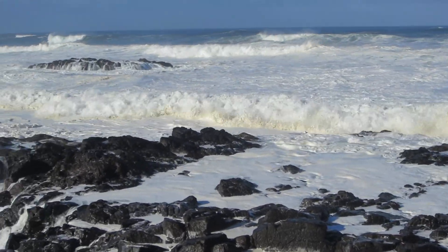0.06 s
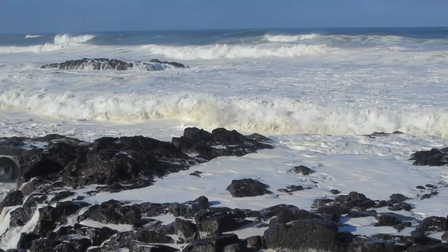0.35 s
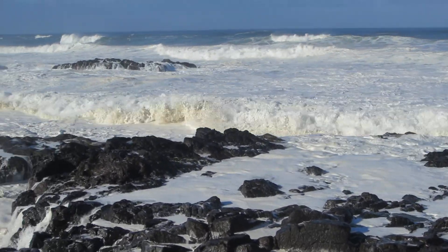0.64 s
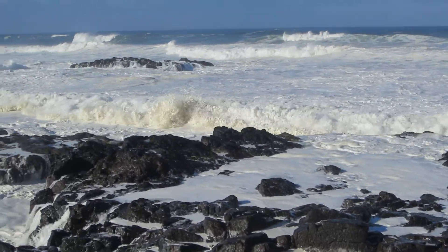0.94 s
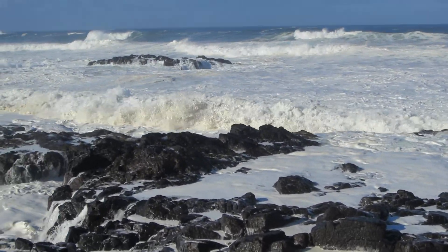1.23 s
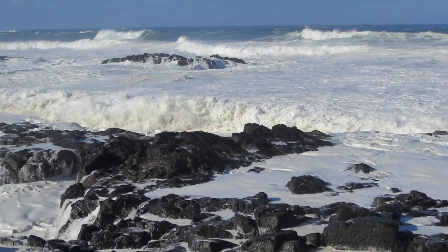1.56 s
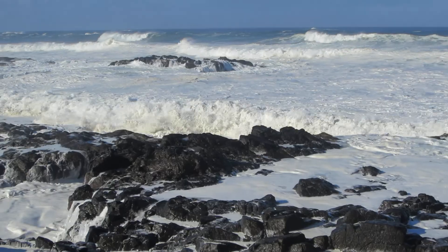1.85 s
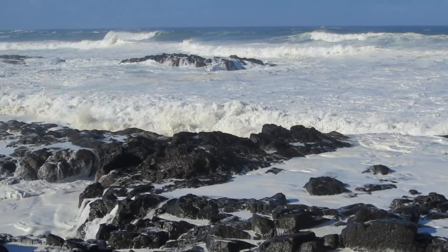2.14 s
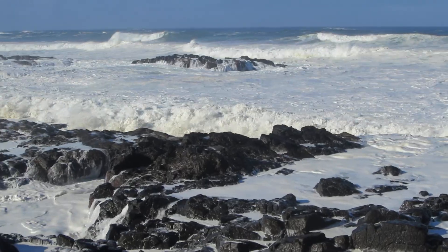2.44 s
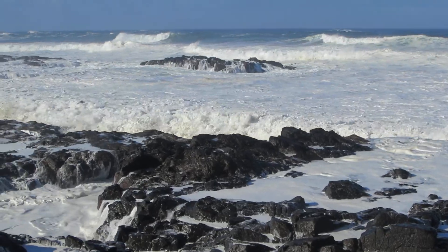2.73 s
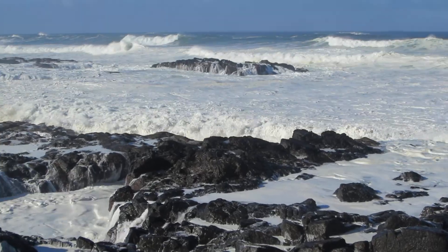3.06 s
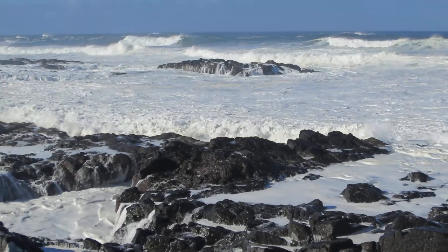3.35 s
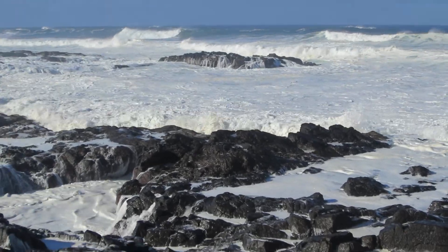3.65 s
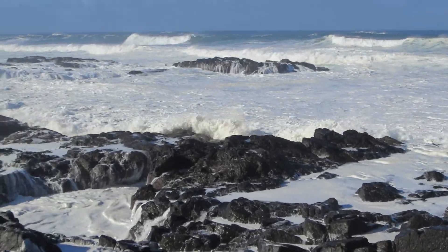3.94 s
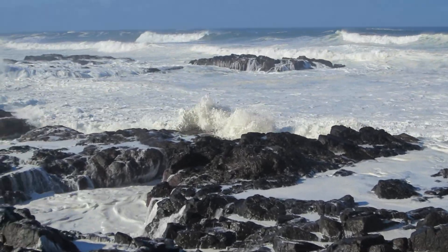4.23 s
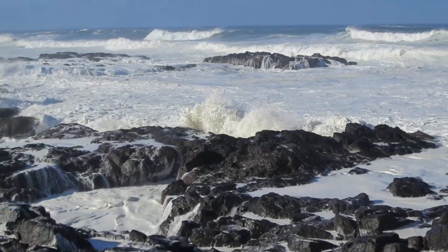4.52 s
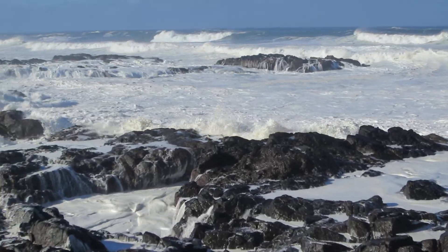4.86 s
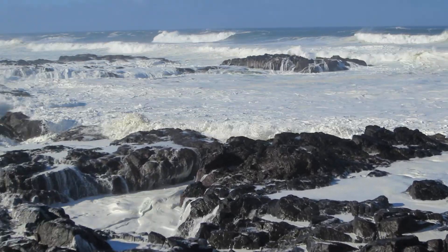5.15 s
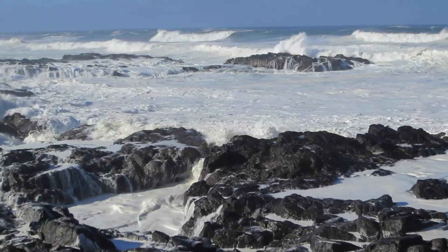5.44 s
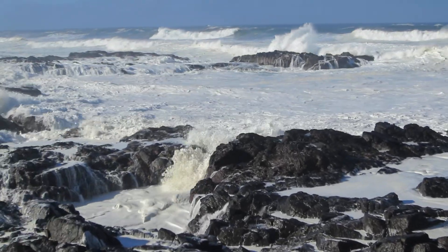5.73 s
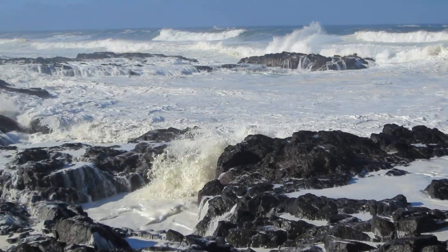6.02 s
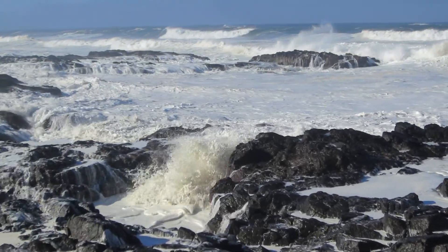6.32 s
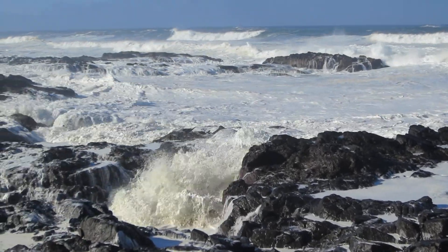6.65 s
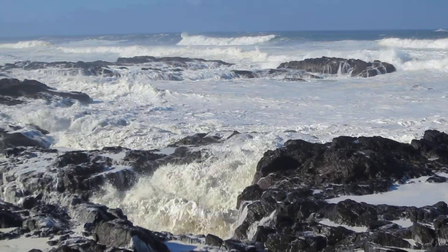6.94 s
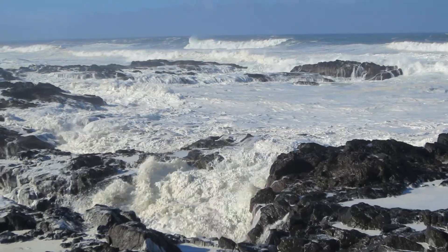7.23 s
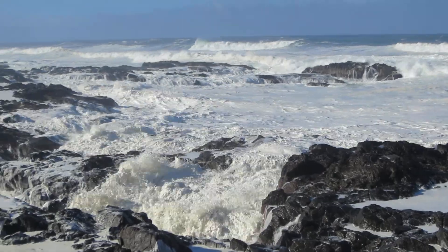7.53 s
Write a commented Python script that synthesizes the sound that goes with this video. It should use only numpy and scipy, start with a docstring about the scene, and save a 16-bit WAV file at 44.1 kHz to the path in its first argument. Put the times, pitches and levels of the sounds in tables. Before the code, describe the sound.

Heard through a small microphone above a rocky shore, large breakers rumble and white water roars without pause, over a wavering low hum. The rumble swells briefly several times while foam fizzes in soft, even pulses. Spray flares briefly on the stone midway. Toward the end, churning water fills a gap in the rocks with a slightly hollow tone, and the fizz grows duller.

```python
"""Heavy surf on rocks

Breakers rumble as clouds of trapped air pulse under them. White water roars in and surges
into a gully, whose hollow rings. Foam bursts in a hiss and spray patters on stone:
the smaller the bubbles, the higher they ring. The treble pulses evenly and a low hum wavers.
All of it is heard from the rocks above, through one small microphone."""
import sys
import numpy as np
from scipy import signal
from scipy.fft import rfft, irfft, next_fast_len
from scipy.io import wavfile
from scipy.ndimage import uniform_filter1d, map_coordinates

SR = 44100
rng = np.random.default_rng(int(sys.argv[2]) if len(sys.argv) > 2 else 0)


def file_out(sig):
    """Save sig as 16-bit WAV at sys.argv[1]."""
    # one column per channel
    cols = np.atleast_2d(sig).T
    # limit, then scale
    lim = np.clip(cols, -1, 1)
    pcm = np.round(lim * 32767).astype(np.int16)
    wavfile.write(sys.argv[1], SR, pcm)


N = 338688

# The surf eases behind the rocks, then gathers again: (time [s], rumble [dB], white water [dB])
SURF_LEVELS = [(0, -23, -28.5), (1.3, -24, -29.5), (3.0, -23, -29), (4.4, -23, -31), (5.2, -26, -31),
               (6.3, -24.5, -31), (7.2, -22.5, -31), (7.68, -24, -32.5)]
# The low rumble swells briefly: (time [s], boost to the rumble [dB])
RUMBLE_SWELLS = [(.68, 2), (2.15, 2), (3.0, 3.5), (3.87, 2), (4.97, 3.5), (5.65, 2.5), (6.68, 1)]
# The foam thins out, its fine spray first: (time [s], hiss [dB], spray [dB], pulse depth [dB])
FOAM_LEVELS = [(.15, -39, -53.3, 3), (1.4, -41.5, -58, 1.5), (2.4, -41.5, -56, 5), (3.3, -41.5, -55.5, 2.5),
               (4.7, -42, -59, 5.5), (5.9, -42, -59, 3.5), (6.45, -41, -60, 4), (6.85, -45.5, -62, 6.5),
               (7.68, -44.5, -61, 9)]
# The tone of the bubbles, from biggest to smallest: (frequency [Hz], relative level [dB])
RUMBLE_SPECTRUM = [(6, -36.5), (19, -7.5), (35, -4.5), (55, 1.5), (80, 1.5), (125, -1), (155, -3),
                   (185, -7), (215, -10.5), (270, -25), (600, -84)]
CHURN_SPECTRUM = [(130, -19), (215, -1.5), (260, 2), (340, 1), (400, -1), (470, -2.5), (620, -27),
                  (1200, -84.5)]
ROAR_SPECTRUM = [(300, -24.5), (450, -5), (540, -1), (620, -2), (720, -4.5), (800, -6.5), (950, -5.5),
                 (1100, -8.5), (1400, -8.5), (1620, -12), (1880, -13), (2150, -20), (3000, -43.5),
                 (7000, -91.5)]
HISS_SPECTRUM = [(1400, -24.5), (1900, -3), (2100, 0.5), (2780, -0.5), (2950, -3), (3400, -5.5),
                 (3740, -9.5), (4000, -10), (5150, -13), (5650, -22.5), (7500, -34.5), (13000, -88)]
SPRAY_SPECTRUM = [(3000, -15.5), (4600, -5), (5700, 0), (7200, -4.5), (8200, -9), (9200, -16.5),
                  (10200, -22.5), (11000, -34), (12000, -52.5), (15000, -77.5)]
# The pitches at which the gully rings: (frequency [Hz], width [Hz], relative level [dB])
GULLY_RESONANCES = [(585, 87, 0), (1797, 110, -7.5)]
# The hum swells and fades: (time [s], level [dB])
HUM_LEVELS = [(0, -42), (.6, -27.5), (1.9, -35.5), (3.2, -31), (4.3, -28), (4.9, -42), (7.6, -35)]
# The microphone's opening weakens narrow bands: (frequency [Hz], width [Hz], gain [dB])
MIC_DIPS = [(590, 47, -1), (1786, 74, -1), (3750, 130, -2)]
# The microphone's own noise: (frequency [Hz], relative level [dB])
MIC_NOISE_SPECTRUM = [(1000, 17), (10000, 7), (11600, -8), (12500, 1.5), (14000, 3.5), (15000, -3),
                      (15700, -2.5)]
# The faint whine of the electronics: (frequency [Hz], level [dB])
WHINE_TONES = [(13518, -91), (15704, -96), (15734, -95)]

PULSE_START_S, PULSE_PERIOD_S = .085, .683
PULSE_RISE_S, PULSE_HOLD_S, PULSE_FALL_S = .063, .15, .47
HUM_HZ, TOP_HZ = 60.75, 15750


def breakers():
    """Great clouds of trapped air pulse under the surf, making a low rumble that swells briefly."""
    rumble_db, _ = curves(SURF_LEVELS)
    swell_db = sum(db * swell(time_s, width_s=.097) for time_s, db in RUMBLE_SWELLS)
    return amp(rumble_db + swell_db) * coloured(rng.standard_normal(N), RUMBLE_SPECTRUM)


def white_water():
    """Large pockets of air churn at the wave's front; smaller ones roar and gurgle on the rocks."""
    _, water_db = curves(SURF_LEVELS)
    churn = coloured(rng.standard_normal(N), CHURN_SPECTRUM)
    gurgle = bubbles(per_second=500, centre_hz=949, octaves=1.09, cycles=3.6, scatter_db=0)
    roar = coloured(rush(patchy_db=.5, frames=18) + amp(-16) * gurgle, ROAR_SPECTRUM)
    churn_db = -3.5 + .8 * wobble(4)
    roar_db = .3 * wobble(3.2)
    return amp(water_db) * (amp(churn_db) * churn + amp(roar_db) * roar)


def gully():
    """Water surges into a gap in the rocks, and the hollow rings with the churning."""
    def hollow(hz):
        return sum(amp(db) * peak(hz, centre, width) for centre, width, db in GULLY_RESONANCES)
    ringing = unit(filtered(rng.standard_normal(N), hollow))
    return amp(-39.5) * swell(middle_s=6.34, width_s=1.5) * ringing


def foam():
    """Foam bursts in a hiss; fine spray patters back on the stone."""
    hiss_db, spray_db, pulse_depth_db = curves(FOAM_LEVELS)
    fizz = bubbles(per_second=900, centre_hz=3340, octaves=.8, cycles=3, scatter_db=2)
    hiss = coloured(rush(patchy_db=.5, frames=14) + amp(-16.5) * fizz, HISS_SPECTRUM)
    patter = bubbles(per_second=650, centre_hz=7200, octaves=.66, cycles=1.5, scatter_db=4.5)
    spray = coloured(rush(patchy_db=.7, frames=14) + amp(-16.5) * patter, SPRAY_SPECTRUM)
    splash = swell(middle_s=3.85, width_s=.19)  # the wave hits the outer rocks
    treble = amp(hiss_db + 2 * splash) * hiss + amp(spray_db + 5 * splash) * spray
    flicker_db = .34 * wobble(14)
    return amp(flicker_db - pulse_depth_db * treble_sag()) * treble


def treble_sag():
    """How far the treble has sunk, 0 to 1: in each pulse it returns quickly, holds, then sags."""
    age = (np.arange(N) / SR - PULSE_START_S) % PULSE_PERIOD_S
    returning = np.clip(1 - age / PULSE_RISE_S, 0, 1)
    sinking = np.clip((age - PULSE_RISE_S - PULSE_HOLD_S) / PULSE_FALL_S, 0, 1)
    return returning + sinking


def rush(patchy_db, frames):
    """Countless bubbles blur into noise; clouds of them make louder patches in time and pitch."""
    noise_grid = signal.stft(rng.standard_normal(N), nperseg=512)[2]
    patches = uniform_filter1d(rng.standard_normal(noise_grid.shape), 5, axis=0)  # smooth over pitch
    patches = uniform_filter1d(patches, frames, axis=1)  # smooth over time
    return unit(signal.istft(noise_grid * amp(patchy_db * unit(patches)), nperseg=512)[1][:N])


def bubbles(per_second, centre_hz, octaves, cycles, scatter_db):
    """Each bubble rings briefly, rising in pitch as it nears the surface."""
    draws = rng.random((int(per_second * N / SR), 4))
    start, pitch, loudness, phase = draws.T[:, :, None]
    hz = centre_hz * 2 ** (octaves * (2 * pitch - 1))
    samples = np.arange(SR // 64)
    age = hz * samples / SR / cycles  # reaches 1 after about `cycles` vibrations
    envelope = np.exp(-age) * (1 - np.exp(-10 * age))
    turns = cycles * age * (1 + .15 * np.tanh(age / 2))
    ring = envelope * np.sin(2 * np.pi * (turns + phase))
    strength = amp(scatter_db * np.minimum(-np.log(1 - loudness), 4))
    positions = (start * N).astype(int) + samples
    return unit(np.bincount(positions.ravel(), (strength * ring).ravel(), N)[:N])  # add them all up


def hum():
    """A low tone that wavers in strength and pitch."""
    hum_db, = curves(HUM_LEVELS)
    phase = 2 * np.pi * np.cumsum(HUM_HZ + .883 * wobble(5)) / SR
    return amp(hum_db + 1.3 * wobble(8)) * np.sqrt(2) * np.sin(phase)


def amp(db):
    """Turn decibels into a number to multiply by."""
    return 10 ** (np.asarray(db) / 20)


def unit(x):
    """Scale x to an average strength (rms) of 1."""
    return x / np.sqrt(np.mean(x ** 2) + 1e-20)


def curves(rows):
    """Join a table's points with straight lines, one curve for each column after the time."""
    times, *columns = np.transpose(rows)
    return [np.interp(np.arange(N) / SR, times, column) for column in columns]


def swell(middle_s, width_s):
    """A smooth rise and fall of height 1."""
    return np.exp(-.5 * ((np.arange(N) / SR - middle_s) / width_s) ** 2)


def wobble(rate):
    """A smooth curve through `rate` random points a second."""
    return map_coordinates(rng.standard_normal(int(N * rate / SR) + 4), [np.arange(N) * rate / SR])


def peak(hz, centre, width):
    """A bump of height 1 around one frequency."""
    return 1 / (1 + (2 * (hz - centre) / width) ** 2)


def filtered(x, response):
    """Multiply each frequency in x by response(hz)."""
    size = next_fast_len(N + SR // 2)
    return irfft(rfft(x, size) * response(np.fft.rfftfreq(size, 1 / SR)), size)[:N]


def coloured(x, spectrum):
    """Shape the tone of x with a spectrum table, then scale it to strength 1."""
    points_hz, db = np.transpose(spectrum)
    return unit(filtered(x, lambda hz: amp(np.interp(np.log(hz + 1), np.log(points_hz + 1), db))))


def scene():
    """The whole shore, in one channel."""
    return (breakers() + white_water() + gully() + foam() + hum())[None]


def record(dry):
    """The microphone and its electronics colour the sound, add noise and whine, and cut the top."""
    def opening(hz):
        return amp(sum(db * peak(hz, centre, width) for centre, width, db in MIC_DIPS))
    noise = amp(-82) * coloured(rng.standard_normal(N), MIC_NOISE_SPECTRUM)
    t = np.arange(N) / SR
    whine = sum(amp(db) * np.sqrt(2) * np.sin(2 * np.pi * hz * t) for hz, db in WHINE_TONES)
    return filtered(filtered(dry[0], opening) + noise + whine, lambda hz: hz < TOP_HZ)[None]


dry = scene()
out = record(dry)
file_out(out)
```